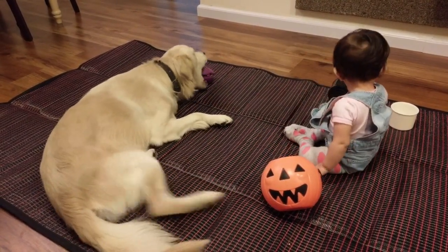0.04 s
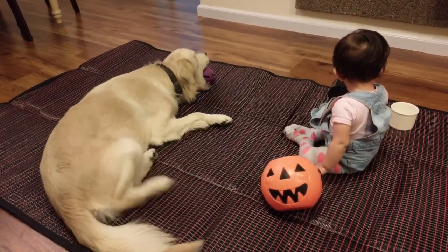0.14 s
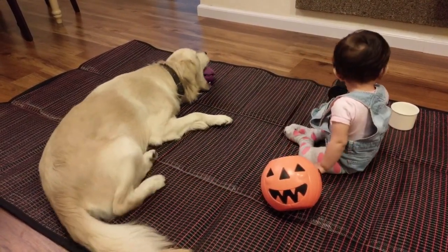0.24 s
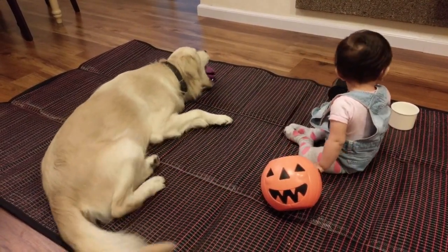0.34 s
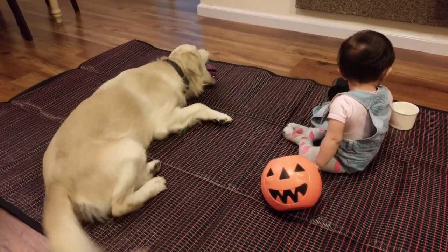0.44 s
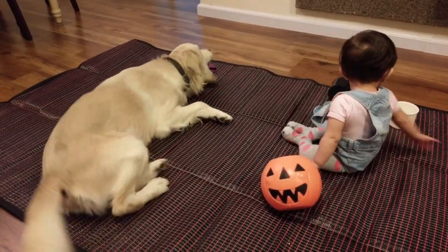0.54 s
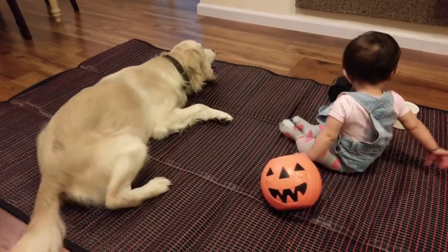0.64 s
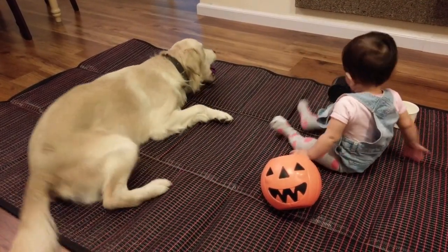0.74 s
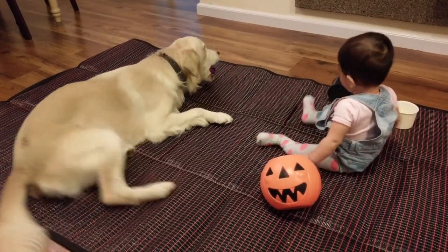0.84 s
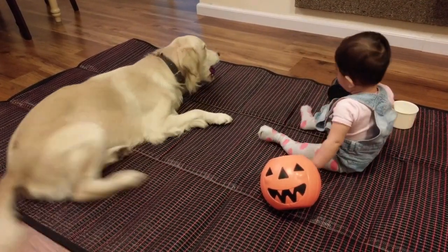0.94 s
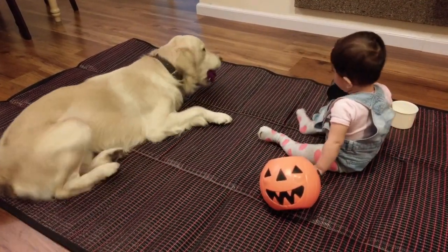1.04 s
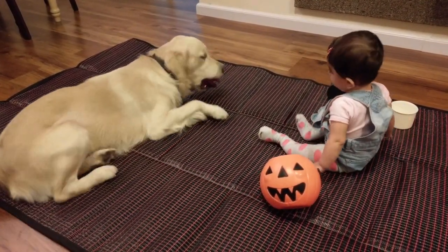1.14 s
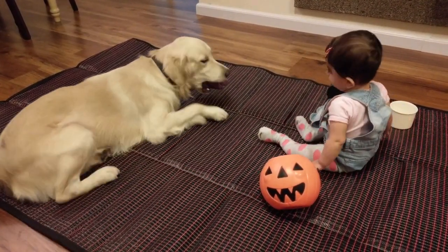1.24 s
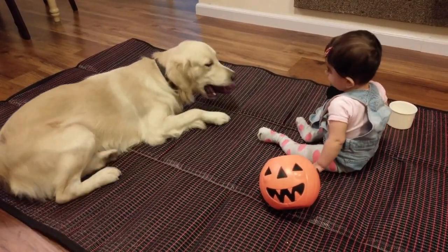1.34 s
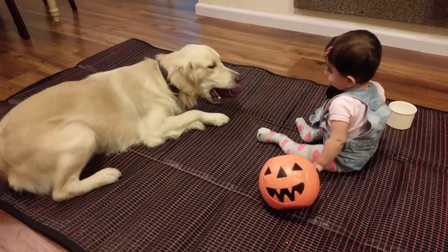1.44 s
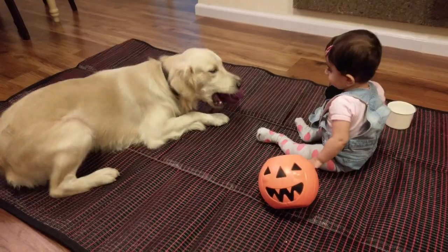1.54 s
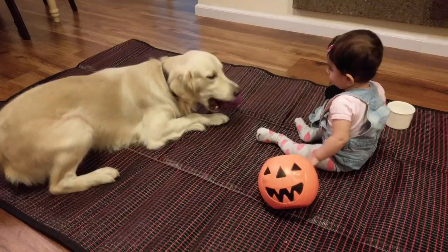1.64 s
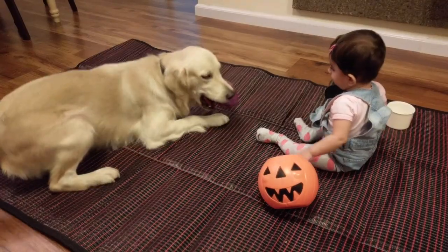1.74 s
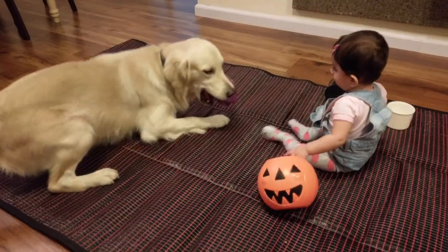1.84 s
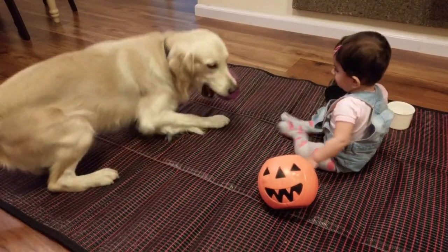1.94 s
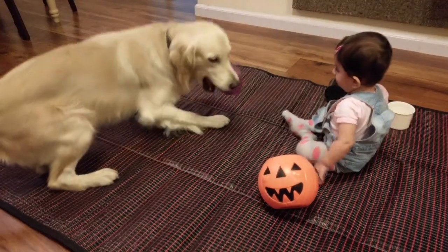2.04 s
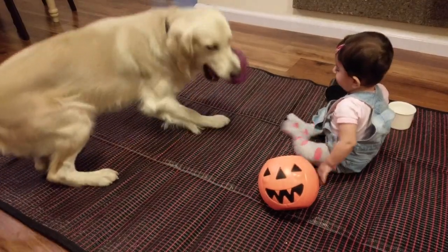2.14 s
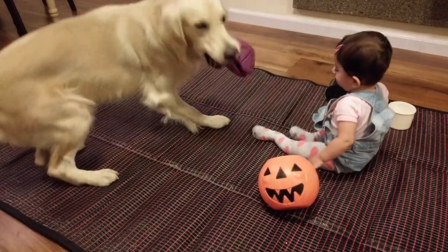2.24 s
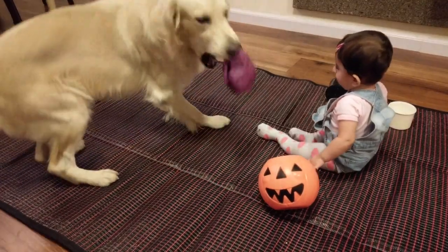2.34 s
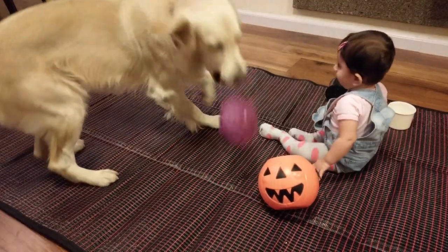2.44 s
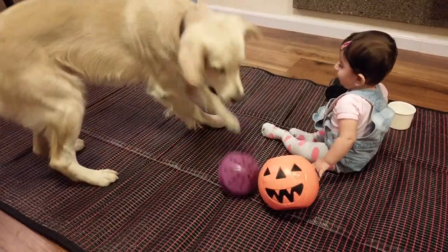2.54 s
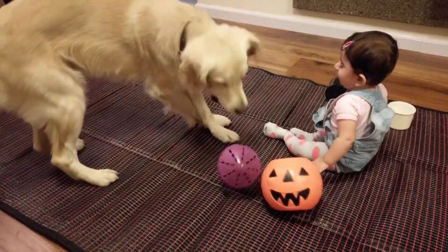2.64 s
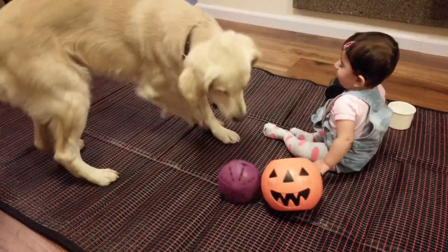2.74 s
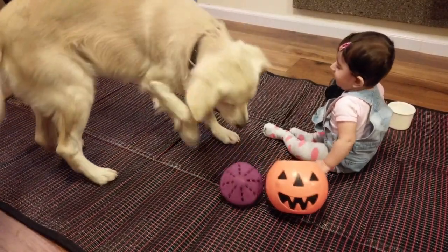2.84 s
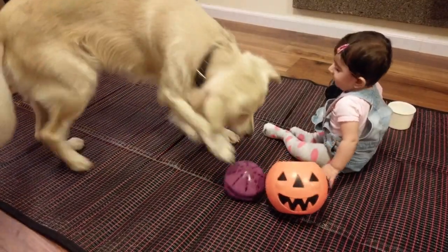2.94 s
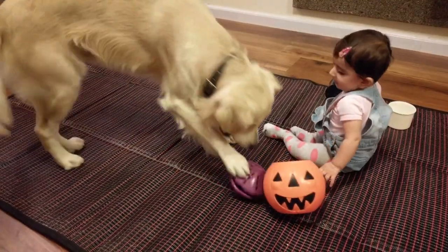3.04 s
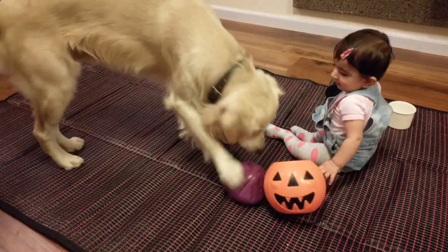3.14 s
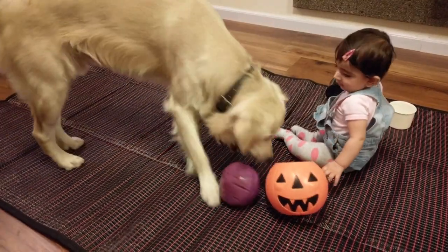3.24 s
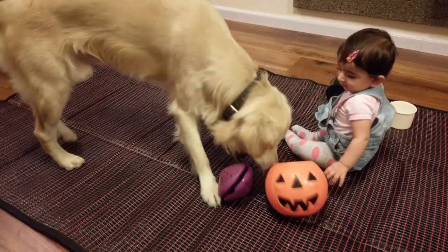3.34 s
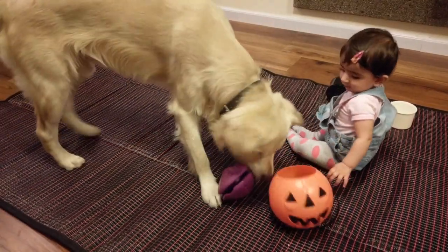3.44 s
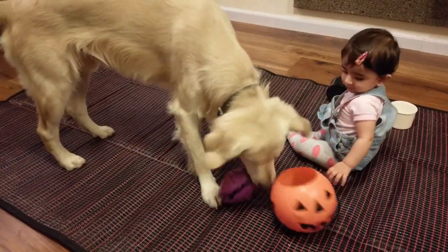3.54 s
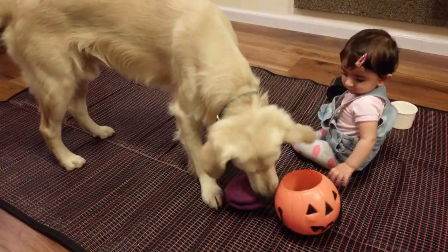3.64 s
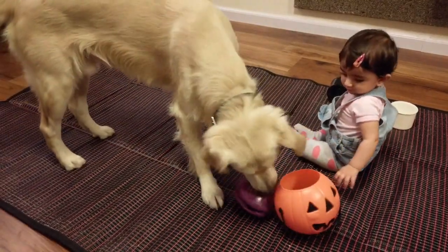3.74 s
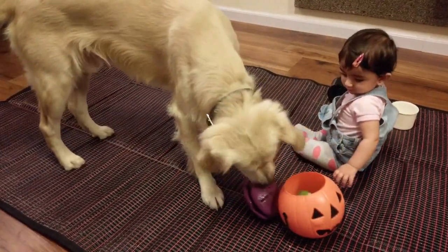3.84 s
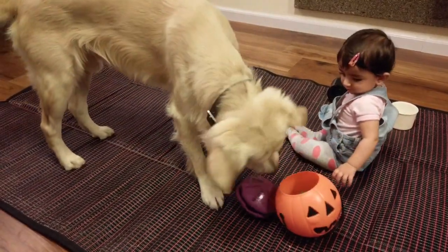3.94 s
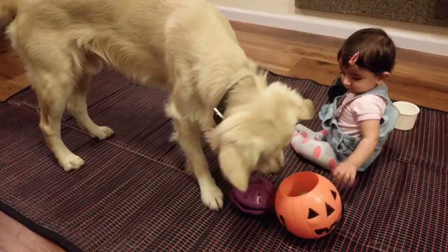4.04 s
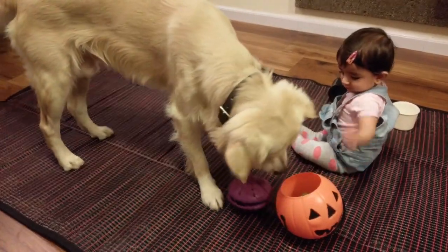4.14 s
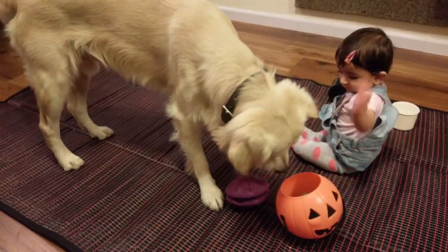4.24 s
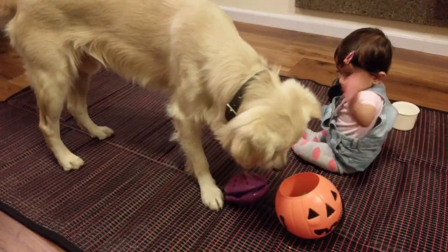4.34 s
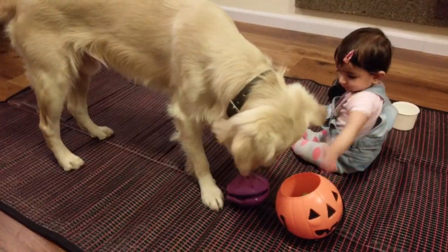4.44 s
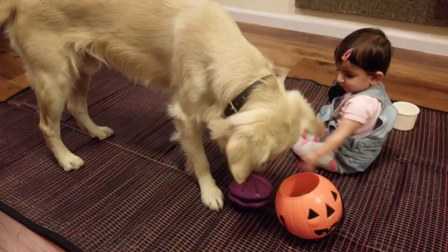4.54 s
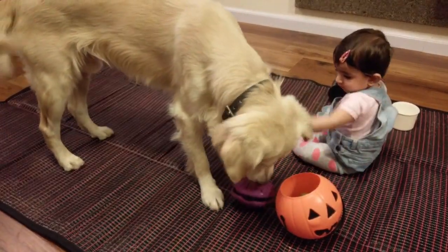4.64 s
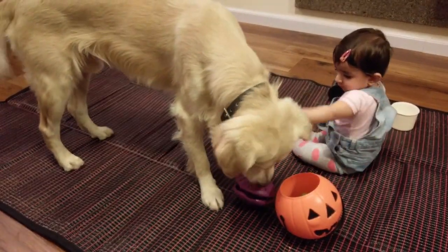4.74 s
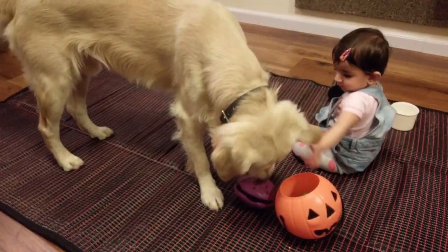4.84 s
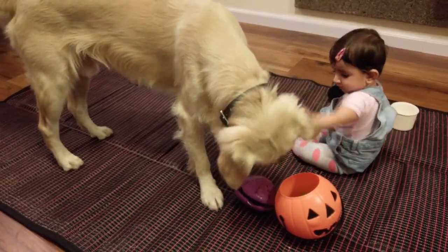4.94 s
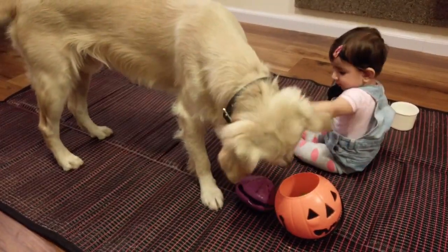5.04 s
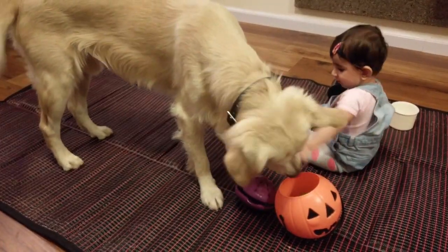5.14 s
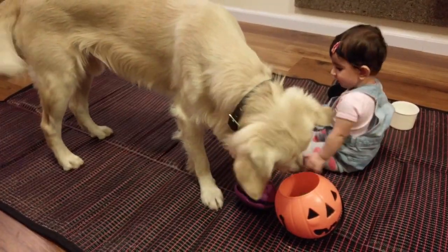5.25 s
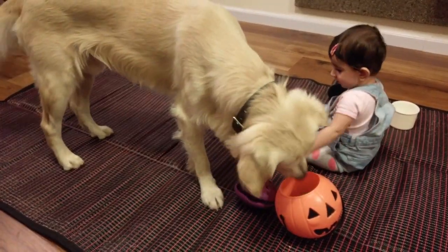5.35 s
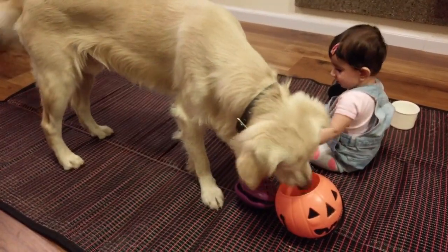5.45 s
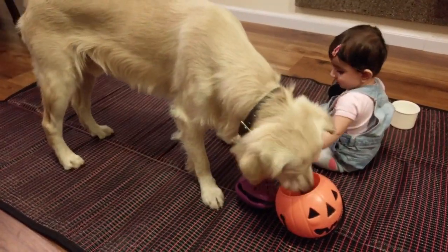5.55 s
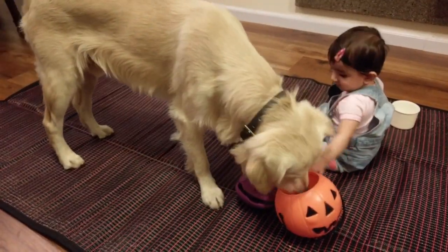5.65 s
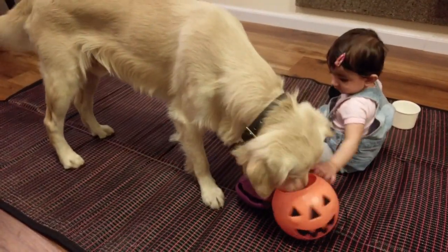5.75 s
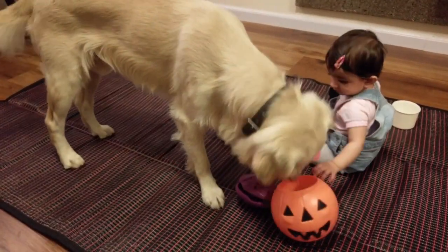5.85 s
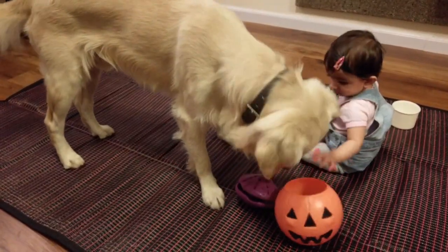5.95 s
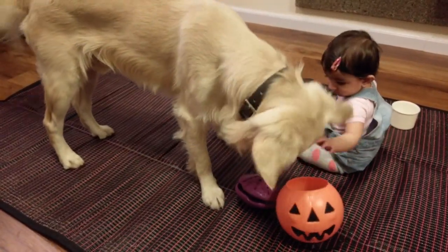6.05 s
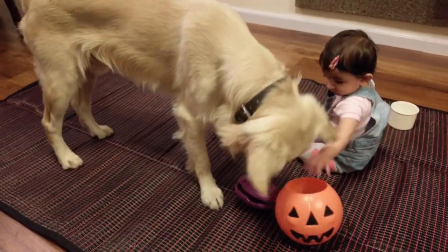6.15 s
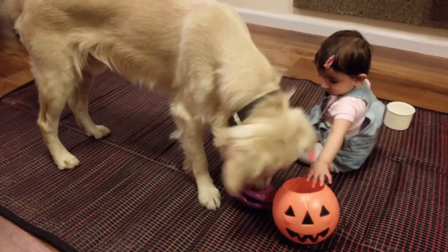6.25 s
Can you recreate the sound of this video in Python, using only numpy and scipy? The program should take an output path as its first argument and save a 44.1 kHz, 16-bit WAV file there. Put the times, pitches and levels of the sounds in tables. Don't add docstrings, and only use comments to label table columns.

```python
import sys
import numpy as np
from scipy import signal
from scipy.fft import rfft, irfft, next_fast_len
from scipy.io import wavfile
from scipy.ndimage import uniform_filter1d

SR = 44100
rng = np.random.default_rng(int(sys.argv[2]) if len(sys.argv) > 2 else 0)


def rack_gain(trim_db):
    fader = np.asarray(trim_db, float)
    return 10 ** (fader / 20)


def transcribe(signal):
    frames = np.atleast_2d(signal).T
    limited = np.clip(frames, -1, 1)
    pcm = np.round(limited * 32767).astype(np.int16)
    wavfile.write(sys.argv[1], SR, pcm)


N = 277159

# pitch_hz, level_db, t60_s
BOARD_MODES = [(131, -26, 0.084), (158, -34, 0.11), (190.3, -33.5, 0.19), (249, -23, 0.091),
               (322, -29.5, 0.13), (388, -33, 0.092)]


def evened(x):
    return x / np.sqrt(np.mean(x ** 2) + 1e-20)


def read(points, hz):
    f_hz, value = np.transpose(points)
    return np.interp(np.log(hz + 1), np.log(f_hz + 1), value)


def add(mix, start_s, sound):
    part = mix[round(start_s * SR):][:len(sound)]
    part += sound[:len(part)]


def colour(x, points, scale=1):
    n = x.shape[-1]
    size = next_fast_len(n + 2048)
    gain_db = scale * read(points, np.fft.rfftfreq(size, 1 / SR))
    return irfft(rfft(x, size) * rack_gain(gain_db), size)[..., :n]


def resonate(x, pitch_hz, width_hz):
    pole = np.exp((2j * np.pi * pitch_hz - np.pi * width_hz) / SR)
    return 2 * signal.lfilter([1 - abs(pole)], [1, -pole], x).real


def resonate_twice(x, pitch_hz, width_hz, second_width_hz):
    return resonate(resonate(x, pitch_hz, width_hz), pitch_hz, second_width_hz)


def ring(modes, detune=1, length_s=.4, contact_s=0.00063):
    t = np.arange(int(length_s * SR)) / SR
    tones = 0
    for pitch_hz, level_db, t60_s in modes:
        tones = tones + rack_gain(level_db - 60 * t / t60_s) * np.sin(2 * np.pi * pitch_hz * detune * t)
    return tones * (1 - np.exp(-t / contact_s))


def crack(lo_hz, hi_hz, t60_s, noise):
    band = signal.butter(2, [lo_hz, hi_hz], "bandpass", fs=SR, output="sos")
    decay_db = -60 * np.arange(len(noise)) / SR / t60_s
    return evened(signal.sosfilt(band, noise)) * rack_gain(decay_db)


def air():
    # pitch_hz, likeness of the ports (-1..1)
    likeness = [(60, 0.78), (240, 0.48), (950, -0.29), (3770, -0.034), (15000, -0.099)]
    # pitch_hz, left_over_right_db
    lean = [(60, -1.5), (240, 1.5), (950, 3.5), (3770, -2), (15000, -1)]
    # pitch_hz, level_db per Hz
    spectrum = [(18, -23), (40, -11.5), (75, -3.5), (120, -10), (160, -15.5), (300, -20), (500, -28.5),
                (1000, -32.5), (2200, -41.5), (5000, -47.5), (8500, -49.5), (12500, -41.5), (15900, -47),
                (16500, -70)]
    frames, hz = N // 512 + 5, np.fft.rfftfreq(2048, 1 / SR)
    a, b, c, d, patches = rng.standard_normal((frames, 1025, 5)).T
    patches = uniform_filter1d(patches, size=20, axis=0)
    patches = evened(uniform_filter1d(patches, size=6, axis=1))
    same = np.clip(read(likeness, hz), -1, 1)[:, None]
    left = a + 1j * b
    right = same * left + np.sqrt(1 - same ** 2) * (c + 1j * d)
    z = np.array([left, right / rack_gain(read(lean, hz))[:, None]])
    z *= rack_gain(read(spectrum, hz)[:, None] + 1.57 * patches)
    return rack_gain(-54) * evened(signal.istft(z, nperseg=2048, noverlap=1536)[1][:, :N])


def hum():
    # pitch_hz, steady_db, waver_width_hz, waver_db
    tones = [(48.23, -54.5, 3.9, -59.5), (98.35, -62.5, 7.5, -61.5)]
    t, out = np.arange(N) / SR, np.zeros((2, N))
    for pitch_hz, steady_db, width_hz, waver_db in tones:
        both, left, right = rng.standard_normal((3, N))
        waver = resonate_twice(both + 0.46 * np.array([left, right]), pitch_hz, width_hz, width_hz)
        out += rack_gain(steady_db + 3) * np.sin(2 * np.pi * pitch_hz * t)
        out += rack_gain(waver_db) * evened(waver)
    return out


def bristles(per_s, spread_db):
    size = rack_gain(spread_db * np.minimum(rng.exponential(1, N), 3))
    clicks = size * (rng.random(N) < per_s / SR)
    return rng.standard_normal(N) * (1 + clicks)


def strokes(rows):
    rise_share, rise_db, release_db_per_s = 0.46, 9, 196
    t, power = np.arange(0, N + 32, 32) / SR, 0
    for start_s, length_s, *levels_db in rows:
        swell_db = rise_db * np.minimum((t - start_s) / (rise_share * length_s) - 1, 0)
        shape_db = swell_db - release_db_per_s * np.maximum(t - start_s - length_s, 0)
        power = power + rack_gain(2 * np.maximum(np.array(levels_db)[:, None] + shape_db, -200))
    return np.array([np.interp(np.arange(N) / SR, t, np.sqrt(p)) for p in power])


def rustle():
    # start_s, length_s, scrape_db, hiss_db, drag_db
    shuffles = [(0.005, 0.09, -55.5, -51.5, -55), (.37, 0.063, -71, -64.5, -67),
                (.505, 0.013, -79, -57.5, -78), (.565, 0.068, -61.5, -57, -61.5),
                (.683, 0.031, -59, -58.5, -56), (.74, 0.037, -57.5, -57, -61.5),
                (.82, 0.049, -56.5, -54, -73), (.89, 0.038, -63, -52.5, -63), (1.045, 0.033, -74, -67, -72),
                (1.22, 0.023, -72.5, -64, -72), (1.32, 0.084, -61, -56.5, -55), (1.44, 0.04, -69, -64, -61),
                (1.68, 0.11, -81, -70.5, -73), (1.8, 0.077, -67, -78, -86),
                (2.09, 0.059, -67.5, -73, -64.5), (2.25, 0.0096, -71, -73, -73), (5.0, 0.07, -77, -78, -78),
                (5.15, 0.054, -77, -76, -70), (5.53, 0.061, -66, -77, -75), (5.62, 0.11, -63.5, -75, -67.5),
                (5.81, 0.087, -75.5, -86, -73), (6.11, 0.12, -75, -75, -74)]
    # start_s, length_s, scrape_db, hiss_db, drag_db
    nudges = [(2.594, .06, -62, -74, -56), (2.673, 0.0093, -56, -52.5, -65), (2.702, 0.059, -63, -74, -57),
              (2.77, 0.046, -59.5, -79, -55), (2.823, 0.065, -65, -57, -60),
              (2.93, 0.048, -59.5, -61.5, -64), (3.067, 0.026, -56, -63, -61),
              (3.138, 0.038, -57, -60, -60), (3.275, 0.059, -59, -73, -61), (3.392, 0.053, -61.5, -60, -64),
              (3.479, 0.08, -55.5, -72, -47), (3.695, 0.04, -58, -70.5, -60), (3.831, .045, -59, -82, -54),
              (3.856, 0.014, -63, -67, -55), (3.887, 0.096, -66, -75, -54), (4.021, 0.083, -66, -77, -58.5),
              (4.401, 0.028, -63.5, -60.5, -73)]
    # time_s, level_db
    fidget_curve = [(0.0, -70.5), (.5, -68.5), (1.1, -69), (1.6, -72), (2.2, -72.5), (2.42, -82),
                    (2.62, -77), (3.6, -73.5), (4.2, -87), (4.5, -73.5), (4.8, -83), (5.5, -82),
                    (6.28, -88)]
    # time_s, level_db
    rocking_curve = [(2.55, -90), (2.62, -71), (2.75, -63), (2.95, -58), (3.14, -52.5), (3.3, -66),
                     (3.51, -49), (3.67, -68), (3.71, -49.5), (3.892, -56), (4.2, -66), (4.3, -80),
                     (4.45, -64), (4.6, -84), (5.58, -89), (5.66, -69), (5.93, -69.5), (6.05, -78)]
    # pitch_hz, level_db
    fur_spectrum = [(3000, -10.5), (6000, -10), (9000, -8.5), (12500, -3.5), (14500, -8), (16500, -16)]
    # pitch_hz, level_db
    pad_spectrum = [(600, -41), (1050, 2.5), (1400, 5), (2500, -1), (4500, -5), (8000, -14.5), (14000, -43)]
    # pitch_hz, width_hz
    hollows = [(620, 440), (397, 127)]
    t = np.arange(N) / SR
    fidget = rack_gain(np.interp(t, *np.transpose(fidget_curve)))
    rocking = rack_gain(np.interp(t, *np.transpose(rocking_curve)))
    between = fidget * rack_gain(np.array([[0.], [1], [-0.3]]))
    scrape, hiss, drag = np.hypot(strokes(shuffles + nudges), between)
    pail_drag = np.hypot(rack_gain(-18.5) * drag, rocking)

    rub = bristles(per_s=600, spread_db=4.0)
    grip_slip = evened(uniform_filter1d(rng.standard_normal(N), size=500))
    rub = rub * rack_gain(2.15 * grip_slip)
    body = 0
    for shake, (pitch_hz, width_hz) in zip((drag, pail_drag), hollows):
        body = body + shake * evened(resonate_twice(rub, pitch_hz, width_hz, 2 * width_hz))
    fur = evened(colour(bristles(per_s=900, spread_db=3.5), fur_spectrum))
    pads = evened(colour(rub, pad_spectrum))
    return rack_gain(3.0) * (hiss * fur + scrape * pads + body)


def strands():
    # start_s, length_s, level_db, pitch_hz
    scuffs = [(.06, .04, -57, 12000), (0.112, .006, -55, 3800), (0.574, .06, -59.5, 723),
              (.688, .035, -57, 820), (.69, .012, -61, 3500), (.748, .06, -55, 680), (.73, .055, -62, 3500),
              (.765, .025, -59, 1300), (0.844, .022, -58, 1700), (.855, .018, -58, 2300),
              (0.859, .012, -56, 2900), (.905, .02, -61, 637), (1.466, .008, -62, 3300),
              (1.99, 0.069, -66, 1200), (2.297, .012, -60, 1300), (2.33, .01, -62, 1000),
              (2.398, .012, -64, 1700), (2.398, .01, -62, 1000), (2.473, .008, -38.5, 1340),
              (2.552, 0.044, -39, 596), (2.625, .015, -45, 550), (2.684, .006, -50, 2480),
              (2.708, .012, -56, 2400), (2.838, .045, -55.5, 1400), (2.96, .011, -50, 1290),
              (2.96, .011, -53, 2300), (3.101, 0.02, -53, 950), (3.168, .006, -52, 5100),
              (3.179, .01, -54.5, 4330), (3.166, .01, -52.5, 1290), (3.313, .01, -56, 1700),
              (3.64, .05, -58, 1000), (3.703, 0.026, -54.5, 2000), (3.943, 0.018, -51.5, 1295),
              (4.084, .01, -61, 1500), (4.407, .008, -52.5, 1240), (4.42, .014, -58, 5900),
              (4.421, .008, -58, 2900), (5.544, .018, -67, 2400), (5.55, .03, -68, 3100),
              (5.612, .015, -66, 2700), (5.64, 0.027, -64, 1300), (5.705, .02, -64, 2200),
              (5.765, .025, -63, 900), (1.34, .07, -60, 750), (1.53, .07, -68, 1350),
              (1.63, .07, -68, 1200), (1.83, .05, -68, 1500), (4.408, .008, -55, 3500)]
    slips_per_s, edge_s, release_db_per_s = 500, .002, 1540
    out, t = np.zeros(N), np.arange(4000) / SR
    draws = rng.random((len(scuffs), 2, len(t)))
    for (start_s, length_s, level_db, pitch_hz), (hiss, chance) in zip(scuffs, draws):
        slips = (hiss - .5) * (1 + 8. * (chance < slips_per_s / SR))
        width_hz = .19 * pitch_hz
        band = evened(resonate_twice(slips, pitch_hz, width_hz, width_hz))
        gain = rack_gain(level_db - release_db_per_s * np.maximum(t - length_s, 0))
        add(out, start_s, gain * np.minimum(t / edge_s, 1) * band)
    return out


def clinks():
    # start_s, peak_db, pitch_hz, t60_s
    clink_events = [(.435, -58, 1170, 0.043), (2.256, -39, 12600, 0.012), (0.63, -56, 3400, .03),
                    (5.772, -59, 770, 0.033), (2.82, -48.5, 257, 0.29), (2.975, -57, 2400, 0.15),
                    (3.075, -50.5, 948, 0.22), (3.944, -53, 1300, 0.1), (4.409, -49, 3460, 0.038),
                    (4.408, -53, 1480, 0.025), (4.455, -64, 2900, 0.14), (5.012, -65, 3700, 0.037),
                    (5.132, -57.5, 1490, .04), (5.149, -65, 900, 0.16), (5.645, -53.5, 340, 0.28),
                    (5.62, -55, 740, 0.033), (5.74, -51.5, 650, 0.046), (5.74, -52.5, 930, 0.039),
                    (3.5, -50, 900, 0.61), (5.87, -60, 890, 0.035), (1.056, -56, 420, 0.068),
                    (6.118, -57.5, 4100, 0.022), (6.135, -60, 3300, 0.027), (.322, -50, 70, .08),
                    (.436, -48, 62, .1), (1.03, -52, 70, .15), (2.468, -28, 200, .03)]
    out = np.zeros(N)
    for start_s, peak_db, pitch_hz, t60_s in clink_events:
        add(out, start_s, ring([(pitch_hz, peak_db, t60_s), (1.04 * pitch_hz, peak_db, t60_s)]))
    return out


def ticks():
    # start_s, peak_db, centre_hz
    tick_events = [(0.382, -35.5, 3380), (0.5112, -46, 11000), (0.5666, -53, 11600), (0.635, -46, 9000),
                   (0.691, -44, 9500), (0.6974, -45, 12000), (0.7175, -47, 3310), (1.2537, -48, 12100),
                   (1.4653, -51, 3360), (1.697, -43, 10500), (1.8126, -48, 9370), (2.2558, -50, 13400),
                   (2.6817, -39, 9200), (2.6856, -50, 2520), (2.817, -51, 3630), (2.9604, -60, 2600),
                   (3.0817, -45, 3240), (3.1442, -38, 10500), (3.1704, -49, 5080), (3.178, -39.5, 4240),
                   (3.444, -46, 2580), (3.468, -43, 6500), (3.511, -43, 3630), (3.522, -45, 3050),
                   (3.8691, -46, 2870), (4.217, -54, 12700), (4.4065, -62, 3450), (5.0114, -59, 3010),
                   (6.118, -59, 3530), (.34, -52, 4500), (.425, -52, 9000), (.645, -52, 5000),
                   (1.0545, -62, 900), (3.059, -50, 1800), (3.8255, -48, 2200), (3.87, -46, 6500),
                   (3.9435, -52, 2500), (2.297, -56, 1300)]
    out = np.zeros(N)
    noises = rng.standard_normal((len(tick_events), 600))
    for (start_s, peak_db, centre_hz), noise in zip(tick_events, noises):
        snap = np.concatenate([[5.5], noise[1:]])
        top_hz = min(centre_hz * 2.85, 13500)
        add(out, start_s, rack_gain(peak_db - 4.0) * crack(centre_hz / 1.8, top_hz, 0.012, snap))
    return out


def taps():
    # pitch_hz, level_db, t60_s
    ball_modes = [(671, 4, 0.049), (813, -14, 0.044)]
    # pitch_hz, level_db, t60_s
    pail_modes = [(419, -8.5, 0.21), (374, -7.5, 0.052), (489.5, -8.5, 0.17), (548, -14, 0.15)]
    # start_s, ball_ring_db, pail_ring_db, clack_db, crack_db
    ball_bumps = [(0.859, -64, -68, -66, -62), (1.056, -45, -48, -57, -75), (2.297, -73, -75, -64, -89),
                  (2.512, -33, -32, -65, -51), (2.56, -39, -51, -70, -58), (2.663, -36.5, -54, -48, -68),
                  (2.681, -35, -75, -47.5, -56), (2.904, -37.5, -48, -54, -70), (3.074, -43, -63, -55, -69),
                  (3.182, -39, -52, -56, -49), (3.262, -48, -67, -58, -72),
                  (3.282, -45.5, -43.5, -60.5, -64), (3.444, -39.5, -41, -47, -52.5),
                  (3.491, -35.5, -44, -43.5, -58), (3.526, -50, -42, -48, -60),
                  (3.697, -40.5, -40.5, -50, -60), (3.827, -39.5, -49, -48.5, -71),
                  (3.839, -49, -48, -48, -73), (3.945, -43.5, -37, -53.5, -58.5),
                  (4.4075, -50, -53, -58, -57)]
    # start_s, pail_ring_db, clack_db, crack_db
    pail_bumps = [
        (2.733, -43, -55, -59),
        (2.817, -38, -51, -55),
        (2.9605, -51, -52, -64),
        (3.057, -47, -55, -78),
        (3.331, -39.5, -62, -70),
        (3.461, -49, -46.5, -53),
        (3.509, -37, -47.5, -53),
        (3.869, -53, -46, -64),
    ]
    ball_clack_hz, pail_clack_hz, ball_feels_db = 1185, 1090, -15
    out = np.zeros(N)
    bumps = [(*row, ball_clack_hz) for row in ball_bumps]
    for start_s, pail_db, clack_db, crack_db in pail_bumps:
        bumps.append((start_s, pail_db + ball_feels_db, pail_db, clack_db, crack_db, pail_clack_hz))
    noises = rng.standard_normal((len(bumps), 3000))
    for (start_s, ball_db, pail_db, clack_db, crack_db, clack_hz), noise in zip(bumps, noises):
        add(out, start_s, rack_gain(ball_db + 3.5) * ring(ball_modes, 1 + 0.048 * noise[0]))
        add(out, start_s, rack_gain(pail_db + 3) * ring(pail_modes, 1 + .01 * noise[1]))
        snap = np.concatenate([[6], noise[1:]])
        add(out, start_s, rack_gain(clack_db + 9.5) * crack(clack_hz / 1.68, clack_hz * 1.68, 0.026, snap))
        add(out, start_s, rack_gain(crack_db + 4) * crack(1900, 8900, 0.049, noise[::-1]))
    return out


def drop():
    # pitch_hz, level_db, t60_s
    landing_modes = [(577, -22, 0.069), (657, -4.5, 0.016), (802, -27.5, 0.081), (1380, -29.5, 0.023)]
    squash_s, land_s = 2.4605, 2.4648
    out, noise = np.zeros(N), rng.standard_normal((4, 9000))
    add(out, squash_s, rack_gain(-31.5) * crack(1500, 6500, 0.046, noise[0]))
    add(out, squash_s, rack_gain(-32.5) * crack(10000, 13000, 0.047, noise[0]))
    add(out, land_s, ring(landing_modes, length_s=.6, contact_s=.0005))
    add(out, land_s + 0.00507, ring(BOARD_MODES, length_s=.6, contact_s=0.00056))
    add(out, land_s, rack_gain(-23.5) * crack(610, 2040, 0.018, noise[1]))
    add(out, land_s, rack_gain(-53.0) * crack(1100, 11000, 0.62, noise[2]))
    add(out, land_s + 0.00399, rack_gain(-28) * crack(240, 830, 0.15, noise[3]))
    return out


def steps():
    # start_s, thud_db
    paw_falls = [
        (2.69, -41.5),
        (2.82, -38.5),
        (2.87, -42.5),
        (2.91, -49),
        (3.44, -48),
    ]
    out = np.zeros(N)
    for start_s, thud_db in paw_falls:
        add(out, start_s, rack_gain(thud_db + 25.5) * ring(BOARD_MODES[:3], contact_s=.004))
    return out


def room(x):
    # pitch_hz, t60_s
    decay = [(100, 0.25), (300, 0.78), (700, 0.47), (1500, 0.7), (4000, 0.44), (12000, 0.25)]
    sparse = np.zeros((2, SR // 2))
    at = np.arange(260, SR // 2 - 20, 20) + rng.integers(0, 20, (2, (SR // 2 - 261) // 20))
    np.put_along_axis(sparse, at, rng.choice([-1., 1.], at.shape), 1)
    hz, t, z = signal.stft(sparse, SR, nperseg=256)
    shared = np.exp(-hz / 1500)[:, None]
    z[1] = shared * z[0] + np.sqrt(1 - shared ** 2) * z[1]
    z = z * rack_gain(-60 * t / read(decay, hz)[:, None])
    tail = signal.istft(z, SR, nperseg=256)[1]
    tail = tail / np.linalg.norm(tail, axis=1, keepdims=True)
    return signal.fftconvolve(x[None], tail, axes=1)[:, :N]


def scene():
    # pitch_hz, left_over_right_db
    shadow = [(60, 12), (180, -1.5), (550, 6.5), (1650, 12.5), (5000, 22.5), (15000, 49)]
    bumps = taps()
    hits = bumps + clinks() + drop() + steps()
    rub = rustle() + ticks() + strands()
    near = hits + rub
    echoes = rack_gain(-6) * room(hits - (1 - rack_gain(-2)) * bumps) + rack_gain(-11.0) * room(rub)
    left = near + echoes[0]
    right = colour(rack_gain(-3.5) * near + echoes[1], shadow, -1.24)
    left, right = np.array([left, right]) + air() + hum() * rack_gain(np.array([[-.4], [.4]]))
    late = 12
    return np.array([left, np.concatenate([np.zeros(late), right[:-late]])])


def top_cut(x):
    return signal.sosfilt(signal.butter(12, 15900, fs=SR, output="sos"), x)


def record(dry):
    edge = signal.firwin(511, 16600, window=("kaiser", 9), fs=SR)
    mix = signal.oaconvolve(dry, edge[None], "same")
    return top_cut(mix)


dry = scene()
out = record(dry)
transcribe(out)
```